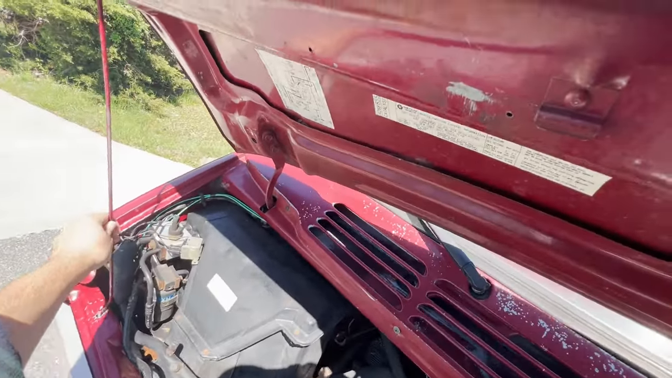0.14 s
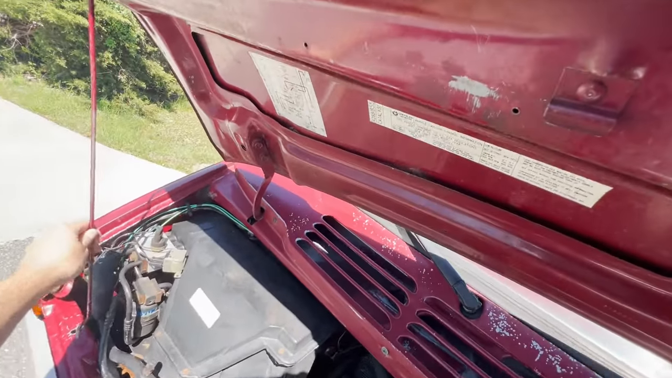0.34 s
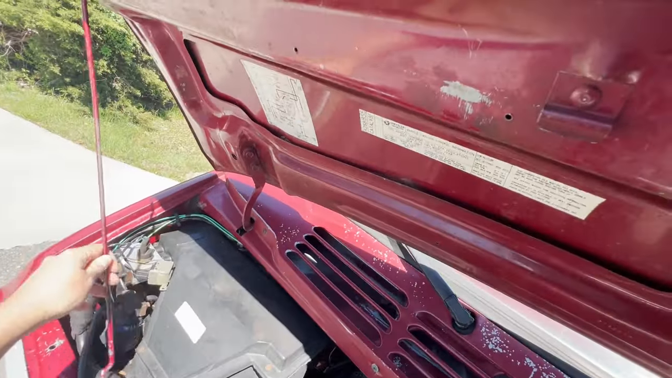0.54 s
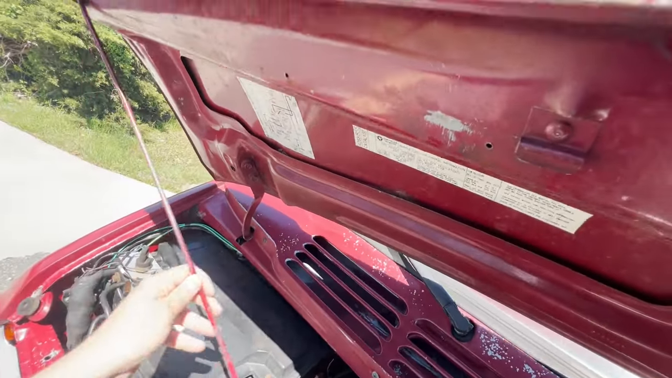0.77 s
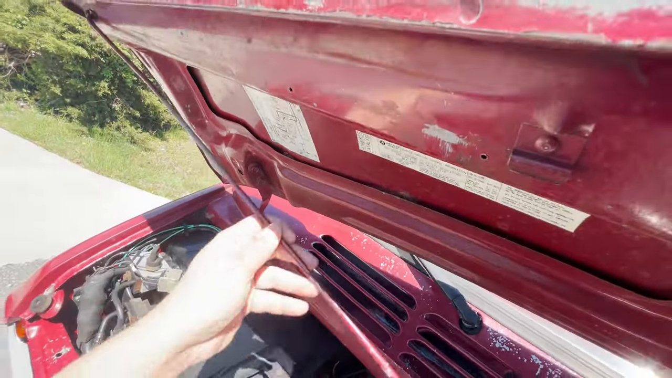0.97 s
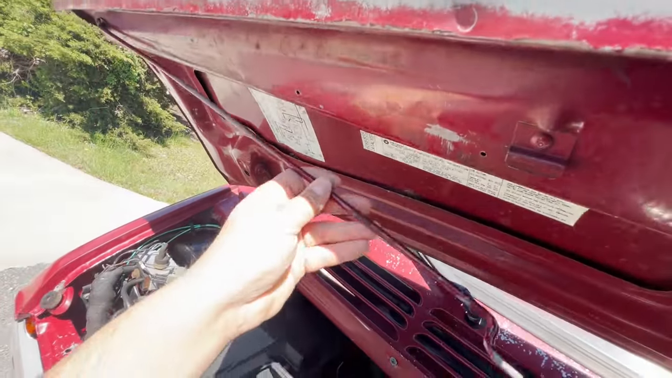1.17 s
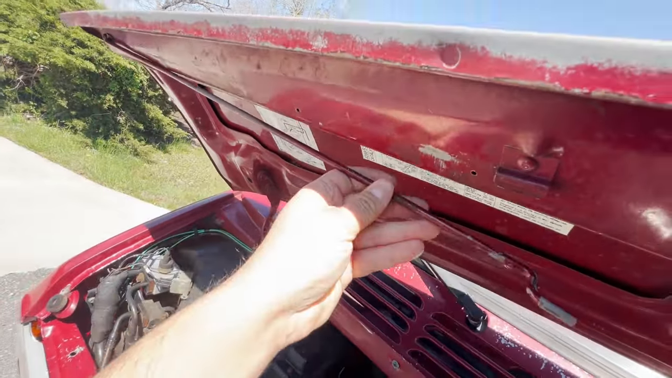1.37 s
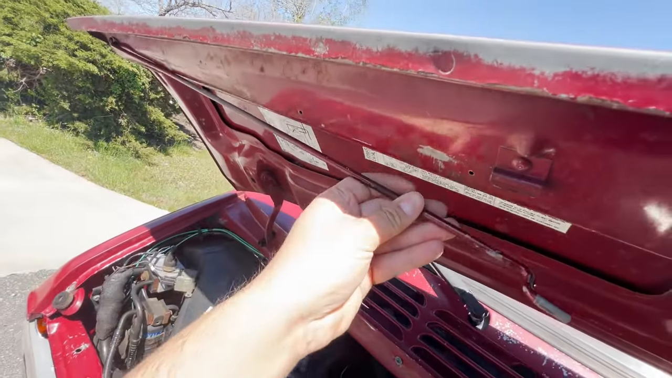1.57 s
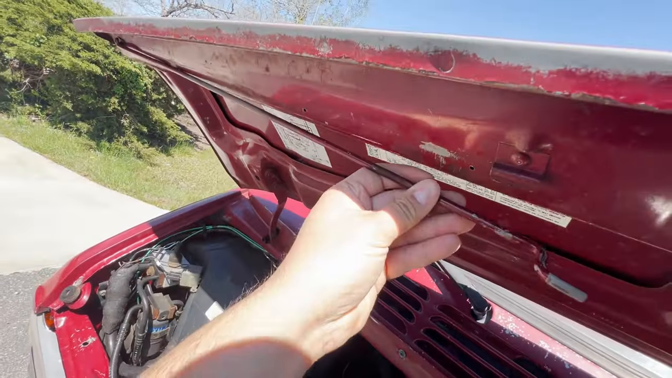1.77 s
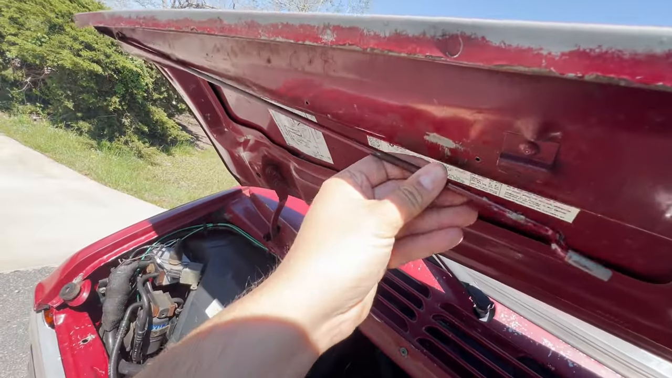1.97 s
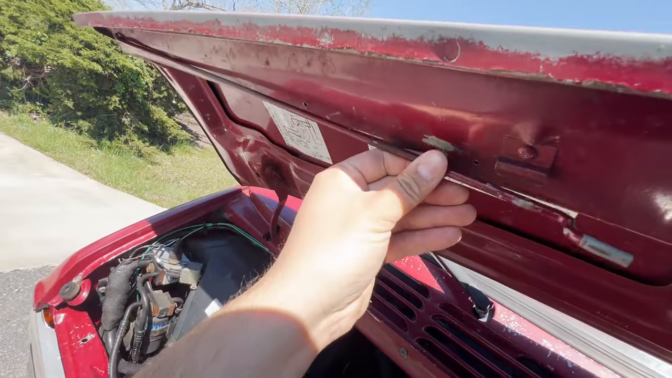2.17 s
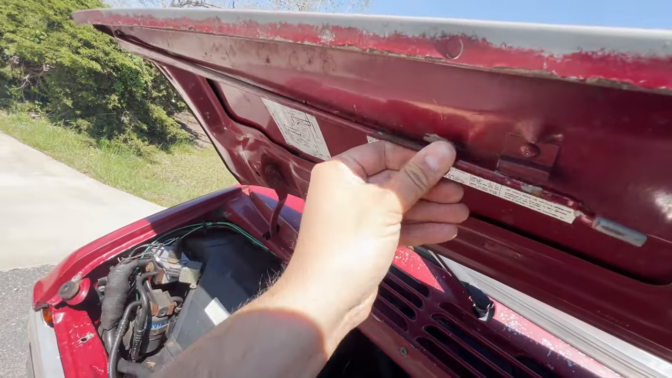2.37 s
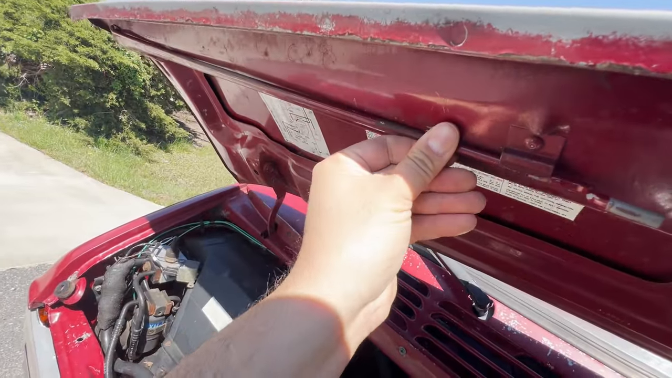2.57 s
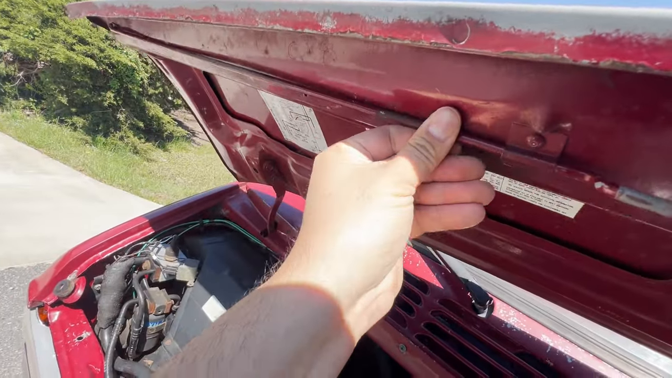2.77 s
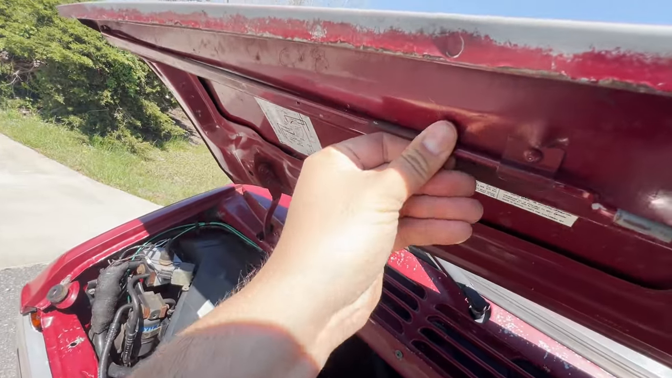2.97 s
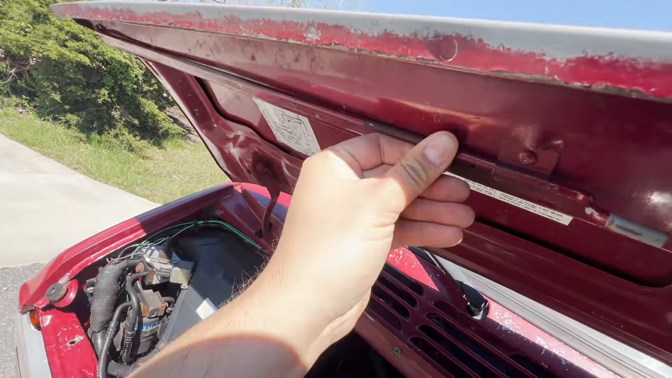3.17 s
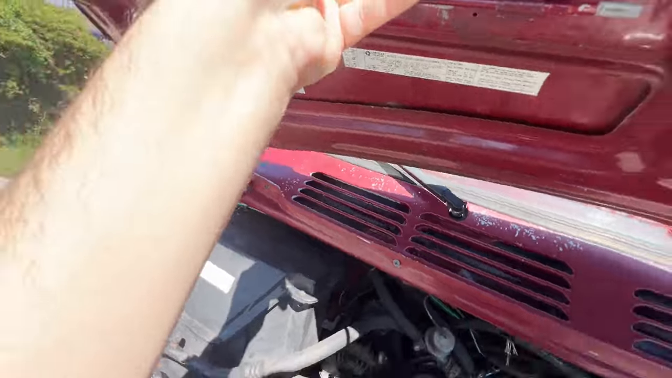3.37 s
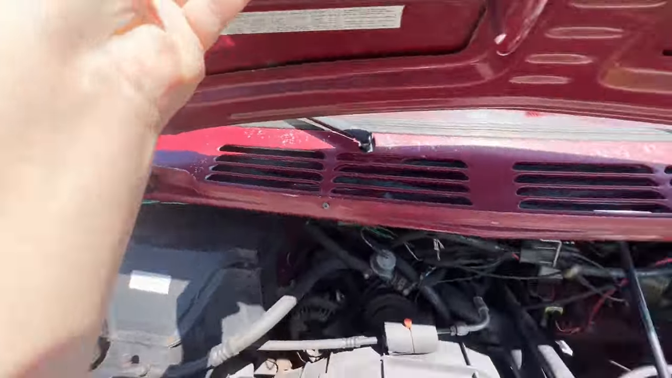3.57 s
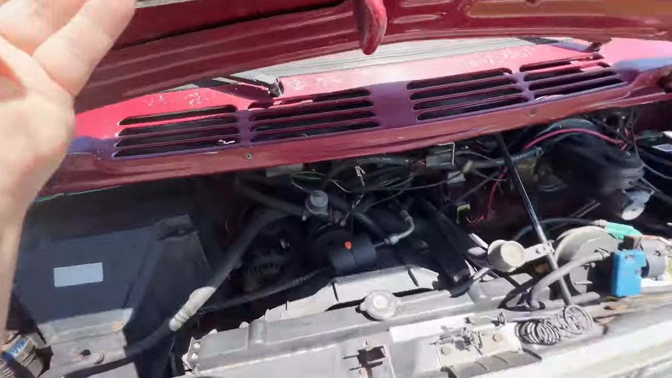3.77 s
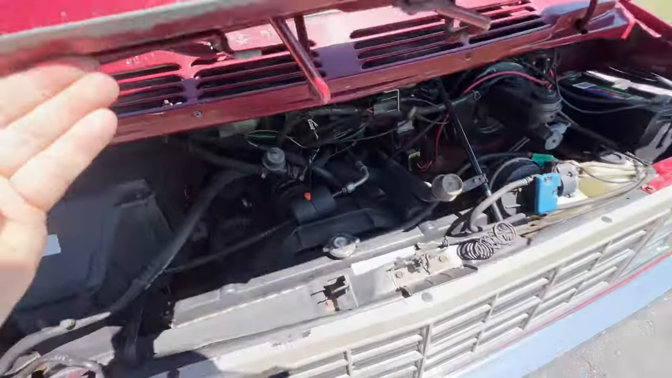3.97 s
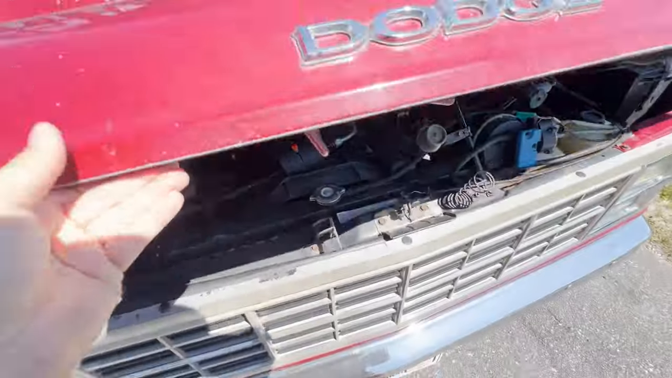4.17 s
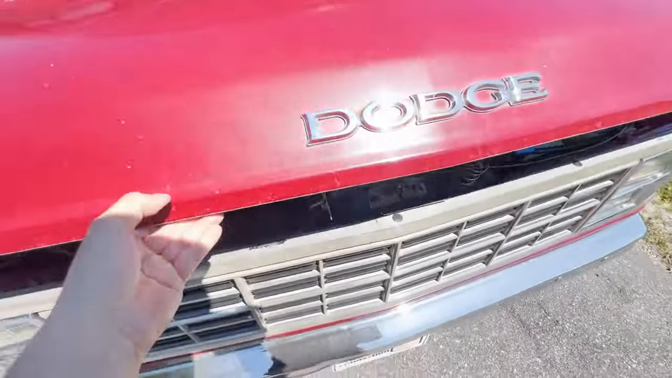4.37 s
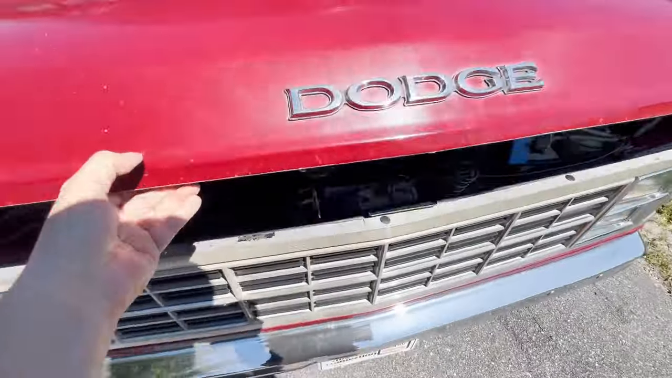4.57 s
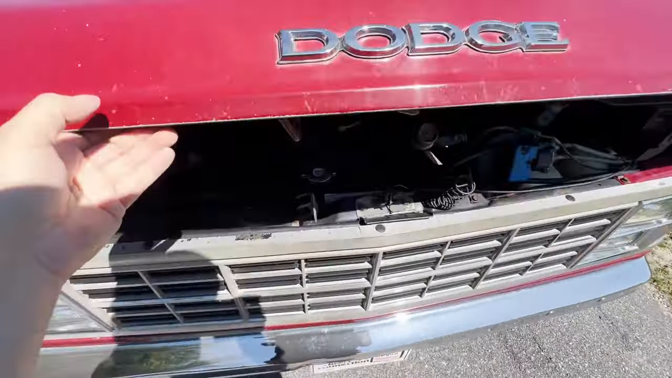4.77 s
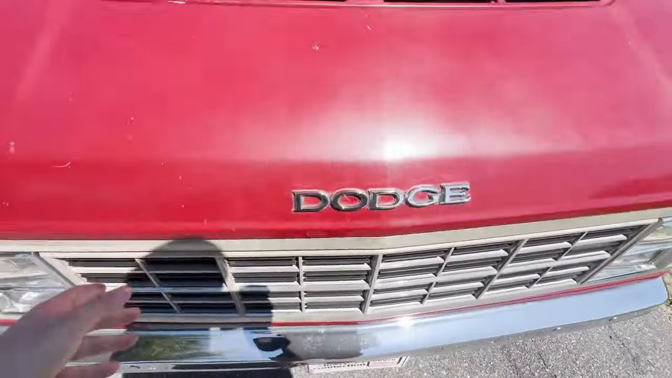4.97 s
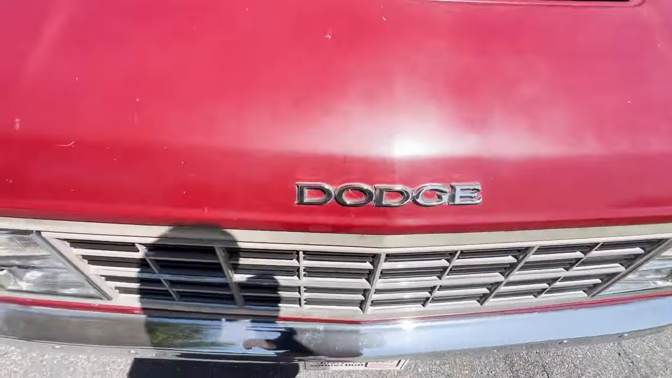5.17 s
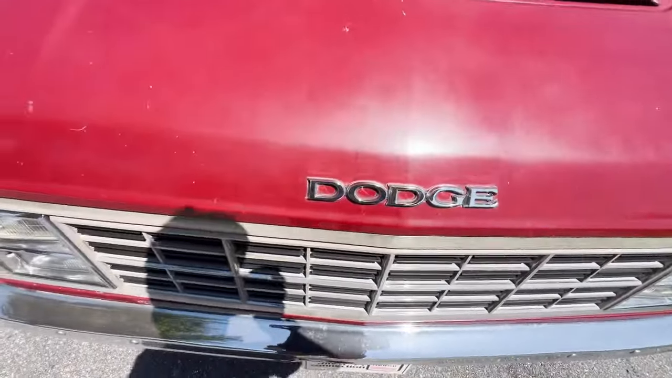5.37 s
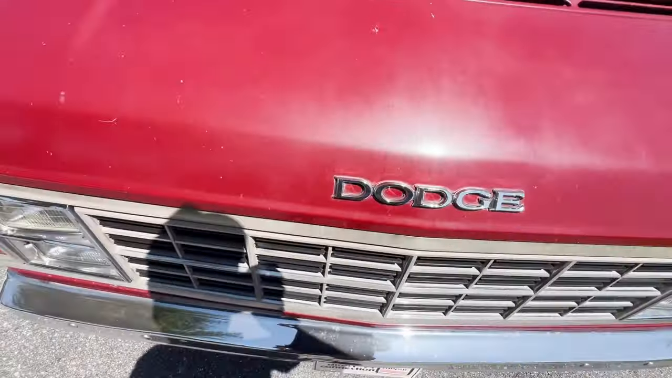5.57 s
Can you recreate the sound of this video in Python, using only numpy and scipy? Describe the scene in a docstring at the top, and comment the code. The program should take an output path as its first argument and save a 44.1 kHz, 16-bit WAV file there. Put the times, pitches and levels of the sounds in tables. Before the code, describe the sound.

Outdoors, faint metallic knocks lead to a bright clip snap, a quiet pause with distant birds, and a loud, booming van hood slam.

```python
"""Outdoors, a van's steel prop rod is unhooked, swung up against the raised hood and snapped into its clip.
Hands and hinges rub, then the hood slams: it hits the catch, crashes onto the body, and the latch rattles.
Each blow rings the metal's clear modes over a wash of shaped noise; far birds are gliding sine tones.
Behind lie a low hum of sines and noise for rumble and hiss, which all drop abruptly at 3.23 s.
One microphone, on the left channel only, passes through a limiter, a bass cut and a treble limit."""
import sys
import numpy as np
from scipy import signal
from scipy.fft import rfft, irfft, next_fast_len
from scipy.io import wavfile
from scipy.ndimage import uniform_filter1d, minimum_filter1d, map_coordinates

SR = 44100
rng = np.random.default_rng(int(sys.argv[2]) if len(sys.argv) > 2 else 0)


def unload_audio(sound):
    """Save the sound as a 16-bit wav file, at the path given as the first command line argument."""
    columns = np.transpose(np.atleast_2d(sound))
    # keep every value between -1 and 1, then stretch to whole-number steps
    steps = np.round(np.clip(columns, -1, 1) * 32767)
    wavfile.write(sys.argv[1], SR, steps.astype(np.int16))


N = 247842

# All levels in dB are relative; each source's own gain and the microphone gain follow.

# the hood hits the safety catch: [start_s, level_db, low_thump_db]
CATCH_BLOWS = [(4.993, -12, -19.5), (4.999, -9, -3.5)]
# weak modes of the shut hood, as noise bands: [centre_hz, level_db, t60_s (time to fall 60 dB)]
SHUT_HOOD_BANDS = [(40, -35, .3), (65, -21, 0.46), (120, -17.5, 0.56), (213, -10, 0.48), (378, -3.5, 0.35),
                   (640, -6, 0.24), (1110, -3.5, 0.22), (1957, -7, .2), (3380, -9, .16),
                   (5200, -13.5, 0.097), (8050, -20, .12), (12200, -30.5, 0.1), (16000, -30.5, .1)]
# clear modes of the shut hood: [pitch_hz, level_db, t60_s]
SHUT_HOOD_MODES = [(55, -14, .45), (78, -9, 0.31), (91.94, -2.5, 0.5), (190.7, -0.5, 0.59),
                   (203.1, 4.5, 0.27), (250, -1.5, 0.32), (293, -17.5, 0.84), (335, -1.5, 0.39),
                   (387, 2, 0.33), (438, 1.5, .24), (504.6, -1, 0.17), (557.3, -4.5, 0.34),
                   (614, -24, 0.82), (637.6, 2, 0.19), (704, -4, 0.25), (775.3, -7, 0.33),
                   (892, -12.5, 0.16), (1124, -4.5, 0.19), (1308.7, -7.5, 0.25), (2060, -10, 0.25),
                   (2140, -7.5, 0.3), (3000, -18.5, 0.48), (4100, -20, 0.14)]


def slam():
    """The hood strikes the catch, then the body in a quick run of contacts; the latch rattles."""
    catch_clank_db, catch_click_db = -4, 2.5
    blows = [(*blow, catch_clank_db, catch_click_db) for blow in CATCH_BLOWS]
    blows += [*landing(count=7), *latch_rattle(count=7)]
    return amp(-15.0) * strikes(blows, SHUT_HOOD_BANDS, SHUT_HOOD_MODES, ripple_db=2.0, ring_db=-5.0,
                                crack_db=3.0, crack_t60=0.092, linger_db=-29, linger=3.66)


def landing(count):
    """The hood settles on the body in contacts ever further apart, weaker and duller."""
    land_s, land_db = 5.026, -4.5
    first_gap_s, gap_growth = .009, 1.27
    settle_s, settle_loss_db = 0.097, 20
    # both in the order low thump, clank, hard click
    tone_db = np.array((-1, -1.5, -.5))
    dulling_db = np.array((1.5, 2, 11.5))  # lost over settle_s
    since = 0
    for k in range(count):
        settled = since / settle_s
        # the loss grows with the square of the time since landing
        level_db = land_db - settle_loss_db * settled ** 2
        yield land_s + since, level_db, *(tone_db - settled * dulling_db)
        since += first_gap_s * gap_growth ** k


def latch_rattle(count):
    """The shut hood rocks: the latch ticks at both ends of each swing, fading as the rocking dies."""
    rattle_s, rock_period_s = 5.172, .0475
    first_db, loss_per_swing_db = -44, 3.5
    backswing_db = -7.5  # a softer tick on the way back
    thump_db, clank_db, click_db = 10, 5.5, 0.5
    for k in range(count):
        level_db = first_db - loss_per_swing_db * k / 2 + backswing_db * (k % 2)
        yield rattle_s + rock_period_s * k / 2, level_db, thump_db, clank_db, click_db


def body_thud(s, db, hz, t60):
    """The full weight of the hood gives the body one low push, a decaying sine."""
    out, t = np.zeros(N), np.arange(SR // 2) / SR
    add(out, s, amp(db - 60 * t / t60) * np.sin(2 * np.pi * hz * t))
    return out


# weak modes of the raised hood, as noise bands: [centre_hz, level_db, t60_s]
RAISED_HOOD_BANDS = [(60, -37, .4), (130, -17.5, 0.53), (232, -18, 0.84), (365, -1.5, .42),
                     (580, -2.5, 0.48), (880, -8, .38), (1354.7, -7, .33), (2300, -8.5, 0.25),
                     (3426, -15, 0.16), (5200, -16, 0.125), (8200, -21, 0.06), (12000, -30, 0.056),
                     (16105, -42.5, .05)]
# clear modes of the raised hood with its rod: [pitch_hz, level_db, t60_s]
RAISED_HOOD_MODES = [(112.3, -13.5, 0.81), (138.7, -6, 0.3), (216, -20.5, 0.41), (293, -8, .6),
                     (342.6, -2, 0.42), (364.7, 2.5, .35), (413.7, 0.5, 0.49), (459.7, -4.5, 0.58),
                     (480, -0.5, .45), (558, -8.5, 0.33), (575, -1, 0.52), (615, -4.5, 0.51),
                     (702, -10.5, 0.46), (852, -6.5, 0.49), (1056, -11, 0.41), (915, -11.5, 0.52),
                     (1170, -9.5, 0.37), (1274, -14.5, 0.59), (1387, -10, 0.04), (1806, -6.5, 0.12),
                     (1956, -13, 0.25), (2232, -15, 0.17), (2587, -13.5, 0.044), (2805, -14.5, .2),
                     (3370, -16, .18), (3510, -18, 0.15), (4260, -18.5, 0.083), (5250, -17.5, 0.07),
                     (5700, -20, 0.08), (7510, -22, 0.058)]


def prop_rod():
    """The rod knocks and clicks; the raised hood is its sounding board."""
    return amp(-11) * strikes(rod_contacts(), RAISED_HOOD_BANDS, RAISED_HOOD_MODES, ripple_db=2.5,
                              ring_db=-1.5, crack_db=1.0, crack_t60=0.049, linger_db=-39.5, linger=2.1)


# the rod knocks on the hood: [start_s, level_db, low_thump_db, clank_db, hard_click_db]
ROD_KNOCKS = [(0.001, -39.5, -1, -2, -20.5), (0.233, -42.5, 4, 5, -5), (0.270, -36.5, -3, 0, 0),
              (0.282, -32.5, 4.5, 8.5, 2), (0.306, -33, 5, -12, 0.5), (0.77, -33.5, -4, -18.5, -35),
              (0.92, -47, 2.5, -20, -7), (0.988, -43.5, -1, -8, -19), (1.399, -24, -22, -16.5, -33),
              (1.412, -29, -7.5, -7.5, -5), (1.444, -26, -15.5, -13.5, -8), (1.753, -49, -5, -23, -19),
              (1.891, -42, -8.5, -6.5, -13), (1.958, -51, -3.5, 0, -7), (2.359, -54, -8, 0, -17),
              (2.426, -51.5, -6.5, 8.5, 4), (2.466, -33.5, 0.5, -7.5, -14), (2.489, -41.5, 1.5, -1.5, 6),
              (2.803, -12.5, 0, -3, -1), (3.751, -58.5, 0, -26, -18)]


def rod_contacts():
    """The springy rod strikes again after every knock, weaker and with less click."""
    rebound_s, rebound_db, click_loss_db = .014, -3.5, 5
    for s, db, thump_db, clank_db, click_db in ROD_KNOCKS:
        yield s, db, thump_db, clank_db, click_db
        yield s + rebound_s, db + rebound_db, thump_db, clank_db, click_db - click_loss_db


# the spring clip snaps round the rod: [start_s, level_db, low_thump_db, clank_db, hard_click_db]
CLIP_BLOWS = [(2.794, -34.5, -4, -6, -7.5), (2.8025, -10.5, -3.5, 2, -2.5), (2.807, -16, -1.5, -2, -3)]
CLIP_BANDS = [(90, -38, .08), (160, -14, .1), (400, -2.5, 0.12), (1000, 0, 0.021), (2500, -7, 0.12),
              (5000, -8, 0.073), (8040, -7, 0.063), (11400, -9.5, 0.014), (15000, -27.5, .03)]
CLIP_RING_MODES = [(420, 3, 0.058), (457, 5.5, .09), (813, -1.5, .12), (916, -1, 0.12), (1086, -2.5, 0.11),
                   (1412.5, -7.5, 0.19), (2637, -5.5, 0.077), (4200, -9, .08), (5700, -11, .07),
                   (7580, -3.5, 0.045), (11180, -9, 0.016)]


def clip_snap():
    return amp(-8) * strikes(CLIP_BLOWS, CLIP_BANDS, CLIP_RING_MODES, ripple_db=2.0, ring_db=0.5,
                             crack_db=1, crack_t60=0.022, linger_db=-41.5, linger=2.4)


def strikes(blows, bands, modes, ripple_db, ring_db, crack_db, crack_t60, linger_db, linger):
    """Each blow sets off the part's clear modes and a dense wash of weak ones."""
    out, t = np.zeros(N), np.arange(SR) / SR
    band_hz, band_db, band_t60 = np.transpose(bands)[:, :, None]
    mode_hz, mode_db, mode_t60 = np.transpose(modes)[:, :, None]
    ripple = modal_ripple(ripple_db)

    # a short crack at the contact, the metal's decay, and a weak lingering answer of the engine bay
    crack = amp(crack_db - 60 * t / crack_t60)
    bay_answer = amp(linger_db - 60 * t / (linger * band_t60))
    decay = crack + amp(-60 * t / band_t60) + bay_answer
    wash_shape = decay * (1 - np.exp(-t * band_hz))  # low bands build up more slowly

    ring_shape = (crack + amp(-60 * t / mode_t60)) * (1 - np.exp(-t * mode_hz))
    rings = ring_shape * np.exp(2j * np.pi * mode_hz * t)

    for s, db, *contact in blows:
        wash_gain = amp(band_db + contact_colour(band_hz, *contact))
        wash = noise_bands(band_hz[:, 0], ripple) * wash_shape * wash_gain
        # every point of contact excites the modes differently
        uneven_db = 2 * rng.standard_normal(mode_hz.shape)
        strength = amp(mode_db + contact_colour(mode_hz, *contact) + uneven_db)
        start_phase = np.exp(2j * np.pi * rng.random(mode_hz.shape))
        ring = (strength * start_phase * rings).real
        add(out, s, amp(db) * (wash.sum(0) + amp(ring_db) * ring.sum(0)))
    return out


def contact_colour(hz, thump_db, clank_db, click_db):
    """A heavy contact adds bass, a firm one clank, a hard one treble (dB)."""
    curve = [(200, thump_db), (350, .45 * thump_db), (480, 0), (700, 0), (1900, clank_db), (6500, click_db)]
    return along(curve, hz)


def modal_ripple(depth_db):
    """Peaks and gaps of a metal part's response, wider toward the treble; one gain per Hz."""
    place = 60 * np.log1p(np.fft.rfftfreq(SR, 1 / SR) / 700)
    curve = map_coordinates(rng.standard_normal(int(place[-1]) + 4), [place])
    return amp(depth_db * curve)


def noise_bands(centres, ripple):
    """One second of noise with a rippled spectrum, split into overlapping bands of rms 1."""
    hz = np.fft.rfftfreq(SR, 1 / SR)
    shares = np.array([along(np.c_[centres, own], hz) for own in np.eye(len(centres))])
    radiated = hz ** 2 / (hz ** 2 + centres[0] ** 2)  # little leaves the metal below its lowest band
    random_phase = np.exp(2j * np.pi * rng.random(len(hz)))
    return unit(irfft(shares * ripple * radiated * random_phase, SR))


# hand and hinges rub: [start_s, length_s, panel_drone_db, hiss_db]
RUBS = [(0.059, 0.21, -52, -67), (2.106, 0.16, -51.5, -72), (3.324, 0.15, -52.5, -76.5),
        (3.407, 0.21, -56.5, -81), (4.301, 0.12, -65.5, -74)]


def scuffs():
    """Skin on steel and hinges rub softly: two noise bands under one stroke, unevenly loud."""
    out, t = np.zeros(N), np.arange(N) / SR
    panel_hz, hiss_hz = 402, 2400
    for s, length, panel_db, hiss_db in RUBS:
        stroke = np.sin(np.pi * np.clip((t - s) / length, 0, 1))
        for hz, db in ((panel_hz, panel_db), (hiss_hz, hiss_db)):
            rub = noise([(hz / 6, -35), (hz / 1.19, 0), (hz * 0.98, -2), (hz * 3, -24), (hz * 12, -60)])
            out += stroke * amp(db - 4.5 + 2.3 * wobble(90)) * rub
    return out


# far birds' falling whistles: [start_s, start_pitch_hz, level_db]
FALLING_WHISTLES = [(0.438, 3400, -72.5), (0.867, 3250, -71), (1.236, 3250, -70), (1.594, 3400, -73),
                    (2.291, 3300, -68), (2.735, 3200, -65), (3.183, 2950, -76), (4.194, 2750, -75),
                    (4.57, 3450, -77)]
# a lower, rising answer: [start_s, start_pitch_hz, level_db]
RISING_WHISTLES = [(1.335, 1770, -75), (1.685, 1650, -74), (2.038, 1800, -72)]


def birds():
    """Short gliding whistles and a warble, far off, with a faint echo from the trees."""
    out = whistles(FALLING_WHISTLES, length_s=.042, end_ratio=0.82, bend=1.3)
    out += whistles(RISING_WHISTLES, length_s=0.0366, end_ratio=1.6, bend=1.09)
    out += warble()
    # the echo is decaying noise, down 60 dB in 0.3 s
    echo = rng.standard_normal(SR // 2) * amp(-60 * np.arange(SR // 2) / SR / .3)
    echo /= np.linalg.norm(echo)
    return out + amp(-4) * signal.fftconvolve(out, echo)[:N]


def whistles(calls, length_s, end_ratio, bend):
    """One gliding sine note, repeated at different pitches; end_ratio is end over start pitch."""
    out = np.zeros(N)
    glide = end_ratio ** (np.linspace(0, 1, int(length_s * SR)) ** bend)
    for s, hz, db in calls:
        phase = 2 * np.pi * np.cumsum(hz * glide) / SR
        add(out, s, amp(db) * np.hanning(len(glide)) * np.sin(phase))
    return out


# warbled phrases, loudest on their middle top note: [top_s, period_s, level_db]
WARBLED_PHRASES = [(4.905, .145, -77.5), (5.515, 0.18, -78)]


def warble():
    """The pitch swings twice a phrase; the low notes are weaker and the voice flutters."""
    out, t = np.zeros(N), np.arange(N) / SR
    middle_hz, swing_hz, low_note_dip_db = 2400, 480, 6
    for s, period, db in WARBLED_PHRASES:
        turn = np.clip((t - s) / period, -1, 1)
        swing = np.cos(2 * np.pi * turn)
        phase = 2 * np.pi * np.cumsum(middle_hz + swing_hz * swing) / SR
        level_db = db + low_note_dip_db * (swing - 1) / 2 + 3 * wobble(45)
        out += amp(level_db) * (1 - turn ** 2) * np.sin(phase)
    return out


# partials of the low hum: [pitch_hz, level_db]
HUM_PARTIALS = [(84.4, 1), (111.5, -11.5), (168, -7.5), (252, -12.5), (335, -16)]
# spectrum of the outdoor rumble: [pitch_hz, level_db (per Hz)]
RUMBLE_SPECTRUM = [(12, -58.5), (20, -22.5), (54, -3.5), (86, -4.5), (172, -12), (221, -17), (394, -12.5),
                   (702, -18), (872, -20.5), (1500, -36.5), (1950, -62), (3300, -120)]
# level of the outdoor rumble over time: [time_s, level_db]
RUMBLE_LEVELS = [(0, -54), (1.2, -64), (2.2, -59), (3.23, -61), (4.8, -64.5), (5.62, -60)]
# spectrum of the outdoor hiss: [pitch_hz, level_db (per Hz)]
HISS_SPECTRUM = [(590, -27.5), (1000, -2.5), (1260, -3.5), (1480, -3.5), (1870, -8), (6470, -19),
                 (14900, -20.5), (16000, -17.5)]


def background():
    """Wavering hum of sines over noise for outdoor rumble and hiss; all drop abruptly together at 3.23 s."""
    t = np.arange(N) / SR
    drop_s, drop_length_s = 3.23, 0.027
    drop = np.clip((t - drop_s) / drop_length_s, 0, 1)

    hum = np.zeros(N)
    for hz, db in HUM_PARTIALS:
        hum += amp(db + 0.5 * wobble(1.2)) * np.sin(2 * np.pi * hz * t + 0.2 * wobble(9.6))
    rumble_db = np.interp(t, *np.transpose(RUMBLE_LEVELS)) + 1.1 * wobble(2.3)

    # the hum drops by 17 dB, rumble and hiss by 7 dB
    out = amp(-57.5 - 17 * drop) * hum
    out += amp(rumble_db - 7 * drop) * noise(RUMBLE_SPECTRUM)
    return out + amp(-74 - 7 * drop) * noise(HISS_SPECTRUM)


def noise(spectrum):
    """Noise coloured by (Hz, dB) points, of rms 1."""
    m = next_fast_len(N)
    colour = amp(along(spectrum, np.fft.rfftfreq(m, 1 / SR)))
    return unit(irfft(rfft(rng.standard_normal(m)) * colour, m)[:N])


def wobble(rate):
    """A smooth random curve, rate knots a second."""
    knots = rng.standard_normal(int(N * rate / SR) + 4)
    return map_coordinates(knots, [np.arange(N) * rate / SR])


def amp(db):
    """Decibels to gain."""
    return 10 ** (np.asarray(db) / 20)


def unit(x):
    """Scale to rms 1."""
    return x / np.sqrt(np.mean(x ** 2, axis=-1, keepdims=True) + 1e-20)


def along(points, hz):
    """Read (Hz, value) points on a log axis."""
    f, v = np.transpose(points)
    return np.interp(np.log(hz + 1), np.log(f + 1), v)


def add(track, s, sound):
    """Mix a sound into the track at time s."""
    part = track[max(round(s * SR), 0):][:len(sound)]
    part += sound[:len(part)]


def scene():
    """Everything reaches one microphone, on the left channel; the right stays silent."""
    closing = slam() + body_thud(s=5.0235, db=-12.5, hz=100.86, t60=0.07)
    sound = closing + prop_rod() + clip_snap() + scuffs() + birds() + background()
    microphone_gain = 2
    return np.array([microphone_gain * sound, np.zeros(N)])


def record(dry):
    """A fast limiter holds the loudest blows under full scale; then the bass cut and the treble limit."""
    ceiling, window = .92, 97  # full scale is 1; window in samples
    bass_cut_hz, top_hz = 38, 15900
    needed = 1 / np.maximum(np.abs(dry).max(0) / ceiling, 1)
    gain = uniform_filter1d(minimum_filter1d(needed, size=window), size=window)
    m = next_fast_len(N + SR // 2)
    hz = np.fft.rfftfreq(m, 1 / SR)
    band = hz ** 3 / (hz ** 3 + bass_cut_hz ** 3) * (hz < top_hz)
    return irfft(rfft(dry * gain, m) * band, m)[:, :N]


dry = scene()
out = record(dry)
unload_audio(out)
```